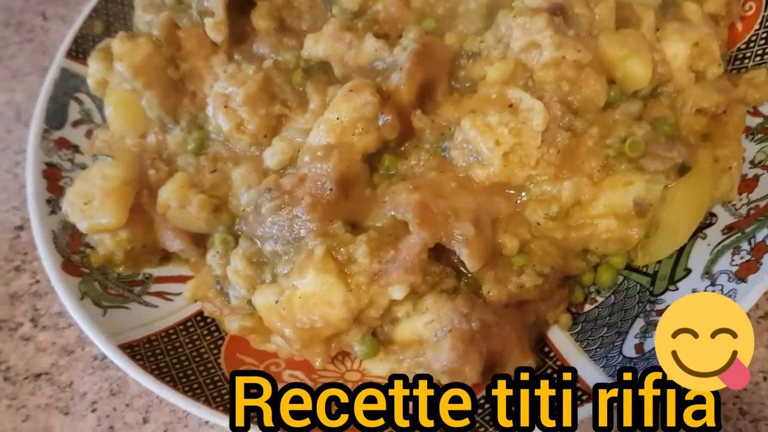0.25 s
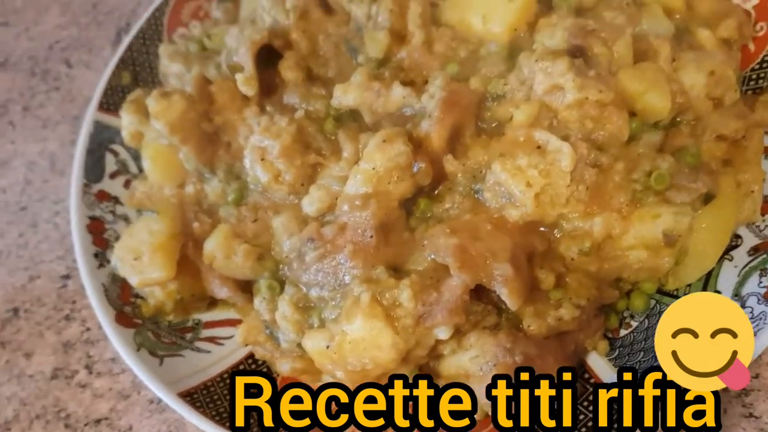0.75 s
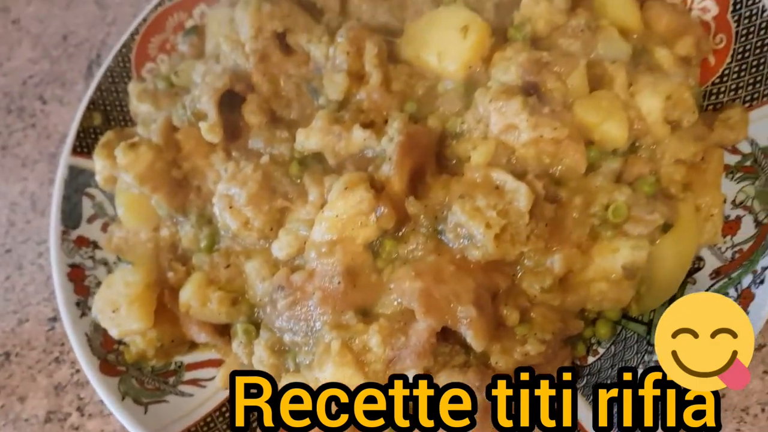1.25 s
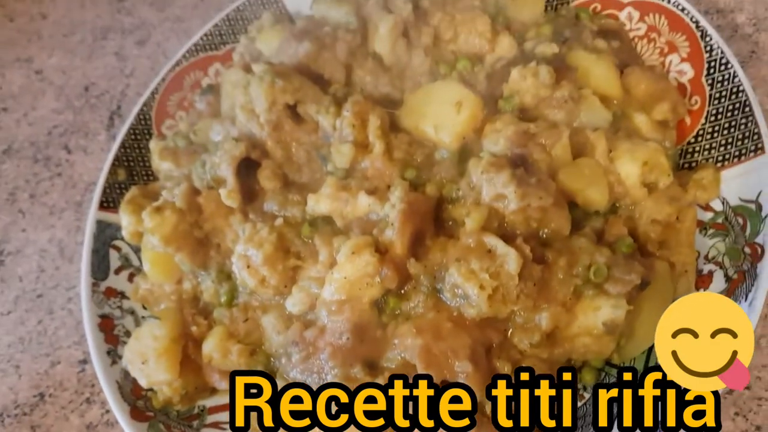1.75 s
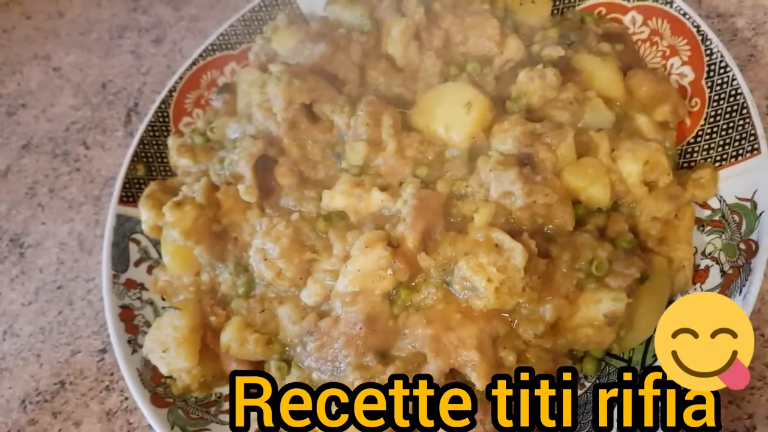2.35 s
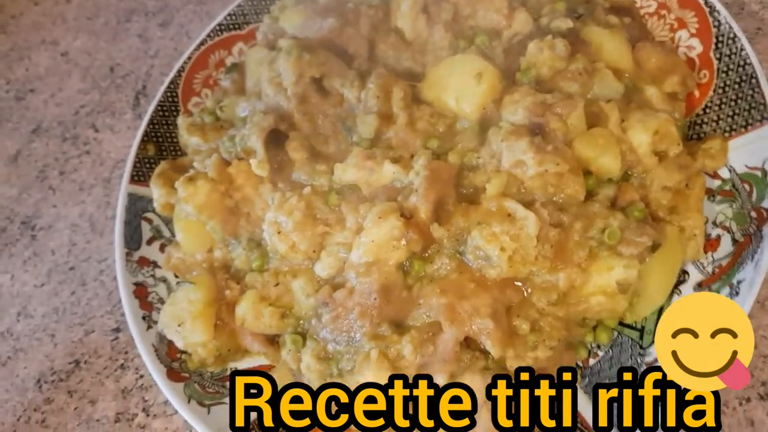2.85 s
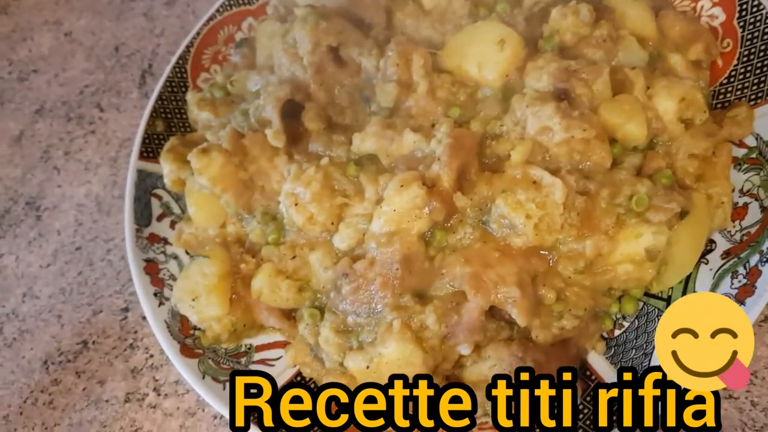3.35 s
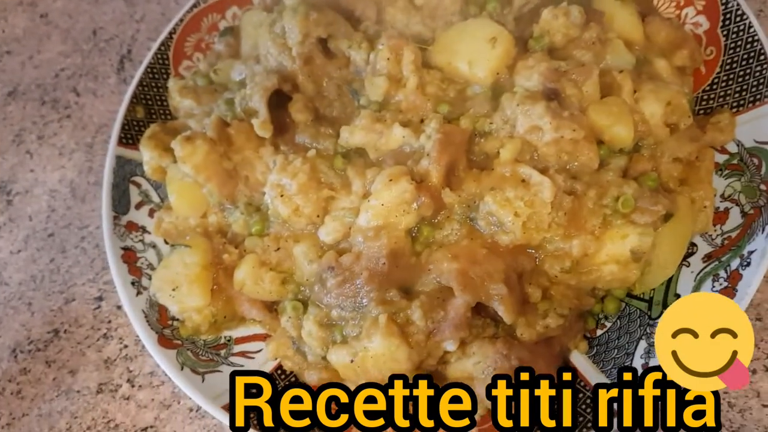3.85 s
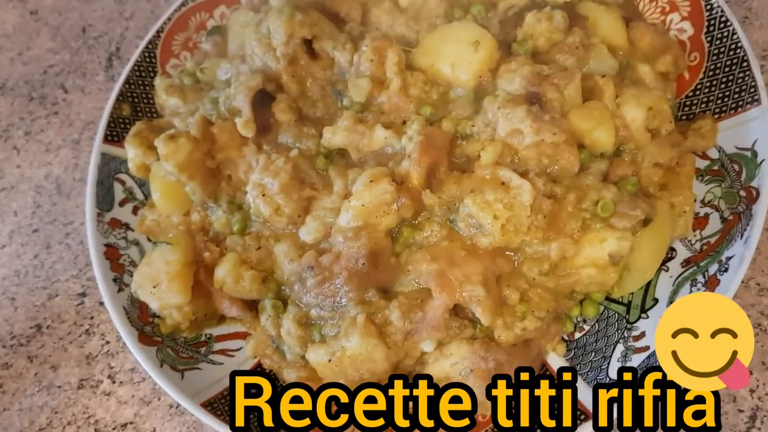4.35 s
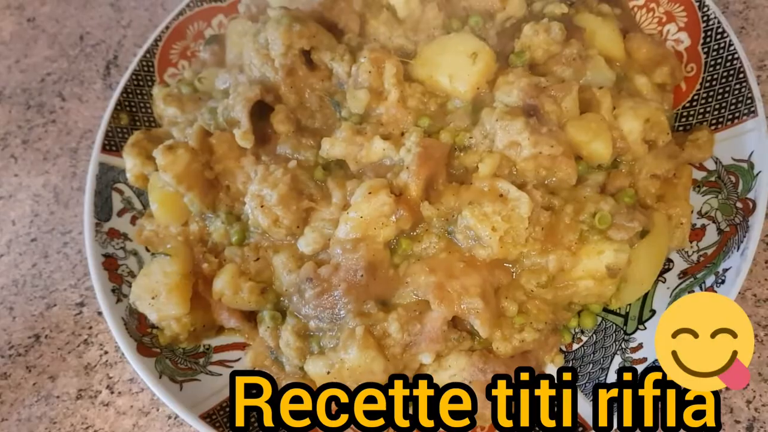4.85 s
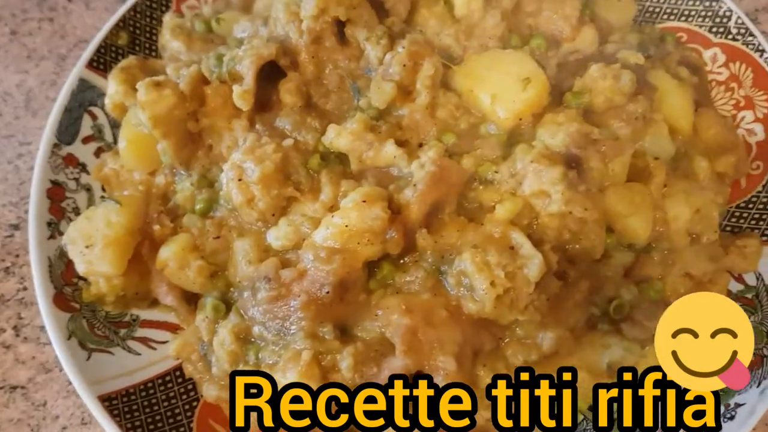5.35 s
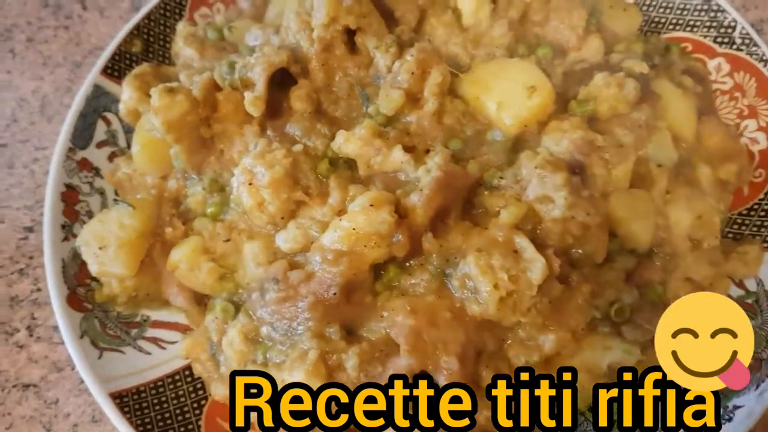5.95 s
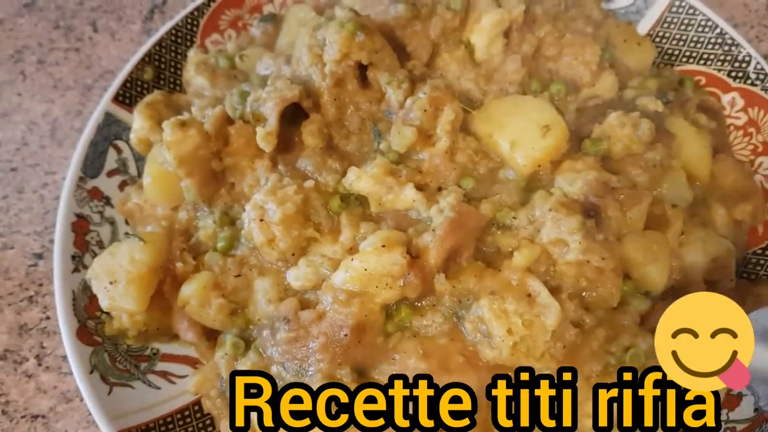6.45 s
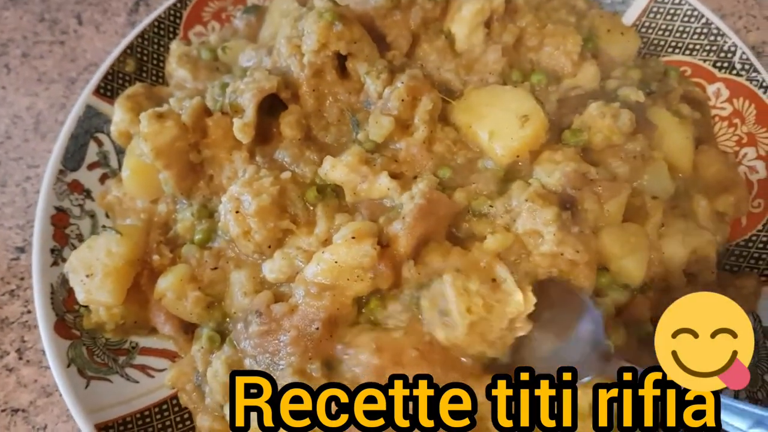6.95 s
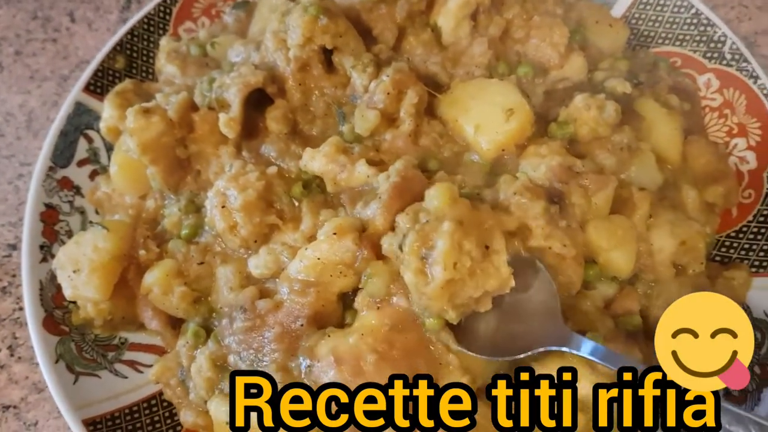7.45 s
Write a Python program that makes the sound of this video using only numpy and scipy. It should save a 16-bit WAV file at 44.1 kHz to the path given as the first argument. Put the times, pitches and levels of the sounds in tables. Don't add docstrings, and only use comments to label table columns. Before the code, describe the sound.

Handheld stereo phone close to a plate of food, with a constant low electrical hum and thin whine from a refrigerator. Low muffled handling rumble and thumps on the right end in one sharp pop, after which everything is quieter for a while. Distant street noise and small chirps pass. A cut shifts the hum, followed by soft sleeve rustling, deep engine throbs, and bright little spoon clinks with short scrapes.

```python
import sys
import numpy as np
from scipy import signal
from scipy.fft import rfft, irfft, next_fast_len
from scipy.io import wavfile
from scipy.ndimage import uniform_filter1d, map_coordinates

SR = 44100
rng = np.random.default_rng(int(sys.argv[2]) if len(sys.argv) > 2 else 0)


def undo_db(level):
    steps = np.asarray(level, float) / 20
    return 10 ** steps


def inscribe(sig):
    pcm = np.round(np.clip(np.atleast_2d(sig).T, -1, 1) * 32767)
    wavfile.write(sys.argv[1], SR, pcm.astype(np.int16))


N = 340011

SHAFT_HZ, MAINS_HZ = 49.122, 49.97
CUT_S, SPLICE_S = 5.668, .005
BEAT_FIRST_S, BEAT_SECOND_S = .2, .2 + 6 / SHAFT_HZ

SHAFT_ORDERS = {2: (-61.5, -62, -61, -60), 3: (-66, -66, -64.5, -62.5), 6: (-61.5, -65, -64.5, -65.5),
                11: (-67.5, -66, -83, -66), 12: (-62.5, -65, -60, -67), 13: (-74, -63, -88.5, -72),
                20: (-106, -66.5, -94, -83), 51: (-71, -72.5, -73.5, -78), 54: (-77, -75.5, -73, -81),
                55: (-63.5, -67, -70, -77), 56: (-69, -56.5, -80.5, -69), 57: (-64.5, -68.5, -68, -70),
                58: (-91, -83.5, -63, -71), 60: (-66, -72.5, -98, -78), 61: (-73.5, -77, -72, -85),
                62: (-72, -66.5, -73, -73), 67: (-77, -77.5, -94, -92), 70: (-74.5, -80, -91, -86),
                74: (-72.5, -73, -77, -72), 76: (-77, -83.5, -80, -86), 77: (-78.5, -79, -90, -72),
                79: (-84, -84, -82, -86), 80: (-72.5, -74.5, -72, -77.5), 87: (-77, -72.5, -88, -86)}
# [multiple, level/dB]
MAINS_ORDERS = [(2, -58), (4, -81.5)]
START_SPOT = {6: 2.7, 11: -5.5, 12: 5.1, 13: -4, 20: -14, 51: -4.5, 55: 1, 56: -3.5, 57: 2.5, 62: -6, 87:
              -12}
LAST_SPOT = {55: 2.5, 56: -6, 57: -2, 60: 4, 79: 6, 87: 2}
FIRST_MOVE_S = [0.77, 1.9]
LAST_MOVE_S = [4.2, 4.9]
NODE_SWELLS = [
    (1.52, 0.42, -2.5, 0.29),
    (2.55, 0.95, 3.5, 0.1),
    (5.47, 0.17, 2, 0.057),
]
NODE_DB = -4.5
WHINE_SWELLS = [(1.6, 0.745, -70, 2.3), (2.4, 3.8, -78, 1.2)]
# [f/Hz, level/dB]
CASING_SPECTRUM = [(700, -22), (1200, -11.5), (2000, -25), (2800, -4.5), (3800, -6), (4300, -5.5),
                   (5000, -9), (5700, -2.5), (7200, -15.5), (8060, -10.5), (8700, -10), (9500, -32.5)]
CASING_LEVELS = [-63.5, -63.5]

# [f/Hz, level/(dB per Hz)]
AIR_SPECTRA = [
    [(18, -35), (30, 11.5), (102, -6.5), (303, -7.5), (491, -8.5), (595, -10.5), (854, -19), (987, -17), (1560, -29), (2290, -32), (2780, -14), (4960, -24), (8220, -31), (9500, -44.5), (12400, -76), (20900, -120)],
    [(18, -56), (30, -7.5), (87, -1), (206, -19), (296, -12), (479, -18.5), (581, -15), (794, -31), (1450, -34.5), (2290, -38), (2780, -24.5), (4960, -33), (8030, -31), (9500, -63), (12400, -81.5), (20900, -120)],
]
AIR_LEVELS = [-55, -54]
# [f/Hz, level/dB]
LEFT_RIGHT_TILT = [(60, -1.5), (110, -6.5), (200, -6), (380, 2), (700, -7), (1290, -8), (2380, 4),
                   (4400, -6), (8120, 7), (15000, -9)]
# [f/Hz, likeness]
LIKENESS = [(60, 0.88), (180, 0.81), (550, 0.44), (1650, 0.065), (4970, 0.072), (15000, 0.014)]
SWAY, SWAY_HZ = 0.27, 500
# [f/Hz, level/(dB per Hz)]
STREET_SWELLS = [(.5, 1.6, -71, .7), (1.75, .35, -68, 0.34)]
STREET_SPECTRUM = [(500, -20.5), (900, -4.5), (1200, 4), (1600, -0.5), (2300, -9.5), (3000, -26)]
ENGINE_SWELLS = [(5.8, 1.95, -59.5, 0.5)]
SURGE_SWELLS = [
    (6.69, 0.078, -45, 0.14),
    (7.02, 0.074, -48, 0.16),
]
SURGE_HZ = 61
# [f/Hz, level/(dB per Hz)]
HISS_SPECTRUM = [(6000, -34), (9300, -9), (11000, -1), (12700, 1), (15000, 0), (16000, -5.5)]

# [f/Hz, level/(dB per Hz)]
RUB_SWELLS = [
    (0, 1.5, -43, 0.93),
    (.62, .01, -42, .8),
    (1.2, .01, -40, 0.45),
    (2.19, .012, -33, .018),
]
RUB_SPECTRUM = [(15, -1.5), (35, -8.5), (55, 7), (120, -4), (250, -27), (500, -25), (900, -48), (3000, -72)]
SCUFF_SWELLS = [(.63, 0.038, -48.5, 0.063), (.83, .004, -55, 0.06)]
# [f/Hz, level/dB]
PORT_COVER = [(.8, 0.7), (1.2, 1), (2.2, 1), (2.23, 0)]
COVER_LOSS = [(300, 3), (1000, -4.5), (2400, -2), (4400, -22), (8000, -37), (12000, -15)]
# [t/s, rise/ms, size]
PRESSURE_STEPS = [(.3174, .9, .045), (.6621, .9, -.18), (.83, 1.5, .015), (2.153, .6, -.04),
                  (2.158, 1, .06), (2.1703, .55, .56), (2.1929, .07, .17), (2.2041, .3, .06)]
# [t/s, depth]
SKIN_SNAPS = [(2.1645, .1), (2.1682, .4), (2.1694, .85), (2.17, 1.4), (2.175, .12)]
SKIN_TEARS = [(2.1935, .6), (2.1946, .4), (2.1961, .18), (2.1987, .28), (2.2019, .32), (2.2038, .5)]
SNAP_MS, TEAR_MS = .085, 0.12
# [f/Hz, level/(dB per Hz)]
PEEL_SWELLS = [
    (2.16, 0.0053, -58, .03),
    (2.182, 0.025, -32.5, .004),
    (2.194, 0.01, -26, .012),
    (2.21, .02, -57, .03),
]
SKIN_SPECTRUM = [(200, 5), (1500, 2), (5000, -8.5), (7000, -8), (8000, -26), (11000, -11.5), (15500, -13)]
# [f/Hz, level/dB]
PORT_STAGES = [(11.5, .3), (61, 2.4)]
PORT_LOSS = [(4500, 0.5), (7800, -18.5), (11000, -1.5)]
OPEN_S, OPEN_T60_S = 2.206, .05

# [t/s, level/dB, f/Hz]
BIRD_CHIRPS = [(1.975, -73, 5060), (2.04, -66, 4520), (2.225, -64, 4540), (2.395, -61, 4590),
               (2.574, -60, 4610)]

# [t/s, peak level/dB, centre f/Hz, width/octaves, left-right level/dB]
SPOON_TICKS = [(5.625, -54, 7000, 1, -1.5), (6.8277, -42, 11700, 0.25, -5), (6.9126, -50.5, 9500, 0.38, -1),
               (6.986, -50.5, 13000, 0.13, -3), (7.0097, -43, 3200, 0.24, 2), (7.01, -44.5, 2800, 1.4, -4),
               (7.106, -48.5, 12000, 0.35, 3), (7.147, -51.5, 11700, 0.17, -2),
               (7.226, -53.5, 1890, 0.37, 0), (7.239, -52.5, 1700, .3, 6), (7.2928, -50, 11000, .4, -2),
               (7.3198, -50.5, 8000, .5, -6), (7.3385, -55, 11000, 0.4, -4.5), (7.3446, -46, 6340, .4, -2)]
# [t/s, peak level/dB, f/Hz, slip gap/s]
SPOON_DRAG = [
    (7.119, -57, 880, .029),
    (7.222, -54.5, 830, .028),
    (7.321, -62, 835, .044),
]
GRIP_DB = 1
# [f/Hz, level/(dB per Hz)]
SCRAPE_SWELLS = [(7.12, .17, -67.5, 0.03), (7.3, 0.13, -67.5, 0.066)]
PLATE_SPECTRUM = [(650, -15), (850, -7), (1100, -21)]

# [f/Hz, level/(dB per Hz)]
SLEEVE_SWELLS = [(6.05, .005, -58, 0.11), (6.19, .005, -64, .15), (6.31, .005, -65, .15),
                 (7.03, .005, -65.5, 0.097), (7.31, .005, -61.5, 0.13), (7.42, .005, -60.5, .1)]
CLOTH_SPECTRUM = [(1500, -24), (3000, -1), (5500, 5.5), (9000, -4.5), (12000, 7), (15700, 3)]
# [f/Hz, level/(dB per Hz)]
BRUSH_SWELLS = [(6.16, 0.15, -60.5, .22)]
COUNTER_SPECTRUM = [(800, -12.5), (1000, -7), (1700, -9.5), (2200, 0), (4500, -2.5), (7000, -12)]

REST_DB, DUCK_DB, CEILING_DB = -1.5, -10, -0.5
DUCK_S, HOLD_S, RELEASE_DB_PER_S = 2.164, 2.15, 10.5
SECOND_DB, SAG_DB_PER_S, JOIN_DB, JOIN_S = -1.5, -0.4, -2.5, .09
BASS_DB, BASS_DIP_DB = 2, -15
TOP_HZ = 15780


def unit(x):
    return x / np.sqrt(np.mean(x ** 2, axis=-1, keepdims=True) + 1e-20)


def along(points, hz):
    f, v = np.transpose(points)
    return np.interp(np.log(hz + 1), np.log(f + 1), v)


def burst(rows):
    t = np.arange(N) / SR
    levels = []
    for s, hold, db, edge in rows:
        outside = np.clip(np.maximum(s - t, t - s - hold), 0, 9)
        levels.append(db - 20 * outside / edge)
    return undo_db(np.max(levels, axis=0).clip(-200))


def wobble(rate, size=N):
    return map_coordinates(rng.standard_normal(204), [np.linspace(0, rate * N / SR, size)])


def filtered(x, response):
    m = next_fast_len(N + SR // 2)
    return irfft(rfft(x, m) * response(np.fft.rfftfreq(m, 1 / SR)), m)[..., :N]


def noise(spectrum, alike):
    def mid_side(hz):
        angle = np.arccos(np.clip(along(alike, hz), -1, 1)) / 2
        return undo_db(along(spectrum, hz)) * [np.cos(angle), np.sin(angle)]
    mid, side = filtered(rng.standard_normal((2, N)), mid_side)
    return unit(np.array([mid + side, mid - side]))


def add_at(out, s, sound):
    start = round(s * SR)
    out[:, start:start + sound.shape[-1]] += sound


def second_shot():
    return np.arange(N) > CUT_S * SR


def beat_clock():
    return np.arange(N) / SR - np.where(second_shot(), BEAT_SECOND_S, BEAT_FIRST_S)


def shaft_tones(t):
    out = np.zeros((2, N))
    knots = np.linspace(0, N, 400)
    after_cut = knots > CUT_S * SR
    early = np.interp(knots / SR, FIRST_MOVE_S, [1, 0])
    late = np.interp(knots / SR, LAST_MOVE_S, [0, 1]) * (knots < CUT_S * SR)
    for k, db in SHAFT_ORDERS.items():
        carrier = np.exp(2j * np.pi * k * SHAFT_HZ * t)
        if k == 6:
            carrier = carrier * undo_db(NODE_DB * burst(NODE_SWELLS))
        start = rng.uniform(0, 2 * np.pi, 3) * (k > 2.5)
        fade = min(k / 50, 1)
        spot_db = START_SPOT.get(k, 0) * early + LAST_SPOT.get(k, 0) * late
        for ch in range(2):
            phase = start[0] + fade * (.3 * start[1 + ch] + .8 * wobble(1.2, size=400))
            level = np.where(after_cut, db[2 + ch], db[ch]) + 3.0 + spot_db
            level = level + 2.8 * fade * wobble(1.4, size=400)
            slow = undo_db(level) * np.exp(1j * phase)
            out[ch] += (np.interp(np.arange(N), knots, slow) * carrier).imag
    return out


def casing(t):
    angle = t * SHAFT_HZ % 1 * 512
    laps = [np.interp(angle, np.arange(512), rng.standard_normal(512), period=512) for _ in range(4)]
    laps = np.array(laps)
    blend = 1.6 * np.array([wobble(1.2), wobble(1.2)])
    mixed = np.cos(blend) * laps[:2] + np.sin(blend) * laps[2:]
    weak = unit(filtered(mixed, lambda hz: undo_db(along(CASING_SPECTRUM, hz))))
    return undo_db(np.where(second_shot(), CASING_LEVELS[1], CASING_LEVELS[0])) * weak


def fridge():
    t = beat_clock()
    mains = sum(-undo_db(db - 3.0) * np.sin(2 * np.pi * k * MAINS_HZ * t) for k, db in MAINS_ORDERS)
    drift = [2 * wobble(5), 2 * wobble(5)]
    whine = burst(WHINE_SWELLS) * np.sin(2 * np.pi * 164 * SHAFT_HZ * t + drift)
    return mains + shaft_tones(t) + whine + casing(t)


def kitchen():
    throb = 1 + .15 * np.sin(2 * np.pi * SHAFT_HZ * np.arange(N) / SR)
    first, second = [undo_db(db + 1.6 * wobble(4.8)) * throb * noise(spectrum, LIKENESS)
                     for spectrum, db in zip(AIR_SPECTRA, AIR_LEVELS)]
    first = filtered(first, lambda hz: undo_db(np.outer([.5, -.5], along(LEFT_RIGHT_TILT, hz))))
    room = np.where(second_shot(), second, first)
    room = filtered(room, lambda hz: 1 / (1 + (40 / (hz + 1)) ** 6))
    beat = np.cos(2 * np.pi * 2 * (MAINS_HZ - SHAFT_HZ) * beat_clock())
    return room - SWAY * beat * filtered(room, lambda hz: 1 / (1 + (hz / SWAY_HZ) ** 4))


def hiss():
    return undo_db(-68.5) * noise(HISS_SPECTRUM, [(1000, 0)])


def rubbing():
    lumps = unit(undo_db(3 * wobble(22)) * noise(RUB_SPECTRUM, [(50, 0)])[0])
    scuff = noise([(200, 5.5), (1500, -11.5), (4000, -19), (6000, -47)], [(50, 0.0095)])[0]
    return burst(RUB_SWELLS) * lumps + burst(SCUFF_SWELLS) * scuff


def pops():
    def pressure(hz):
        w = 2j * np.pi * (hz + 1e-3)
        push = 0
        for s, rise_ms, size in PRESSURE_STEPS:
            push = push + size * np.exp(-w * s + (w * rise_ms / 1000) ** 2 / 2) / w
        for dips, ms in (SKIN_SNAPS, SNAP_MS), (SKIN_TEARS, TEAR_MS):
            pointed = 2 * ms / 1000 / (1 - (w * ms / 1000) ** 2)
            push = push - sum(depth * np.exp(-w * s) for s, depth in dips) * pointed
        for f, q in PORT_STAGES:
            push = push * w * w / (w * w + w * 2 * np.pi * f / q + (2 * np.pi * f) ** 2)
        return SR * push * undo_db(along(PORT_LOSS, hz))
    grains = rng.standard_normal(N) * undo_db(6.6 * rng.standard_normal(N))
    skin = unit(filtered(grains, lambda hz: undo_db(along(SKIN_SPECTRUM, hz))))
    damped = undo_db(-60 * np.clip(np.arange(N) / SR - OPEN_S, 0, 1) / OPEN_T60_S)
    return damped * filtered(np.arange(N) == 0, pressure) + burst(PEEL_SWELLS) * skin


def street():
    return burst(STREET_SWELLS) * noise(STREET_SPECTRUM, LIKENESS)


def bird():
    out, t = np.zeros((2, N + SR)), np.arange(SR // 20) / SR
    envelope = np.sin(np.pi * np.clip(t / .048, 0, 1) ** .7)
    for s, db, hz in BIRD_CHIRPS:
        add_at(out, s, undo_db(db) * envelope * np.sin(2 * np.pi * hz * (t - .4 * t ** 2)))
    tail = rng.standard_normal((2, SR // 5)) * undo_db(-60 * np.arange(SR // 5) / SR / .4)
    tail[:, 0] = 18
    return signal.fftconvolve(out, tail / 12, axes=1)[:, :N] * undo_db([[-2], [-5]])


def join():
    t = np.arange(N) / SR - CUT_S
    return (t > 0) * np.clip(1 - t / JOIN_S, 0, 1)


def gain_db():
    t = np.arange(N) / SR
    release = DUCK_DB + RELEASE_DB_PER_S * (t - DUCK_S - HOLD_S)
    ducked = np.clip(release, DUCK_DB, CEILING_DB)
    first = uniform_filter1d(np.where(t < DUCK_S, REST_DB, ducked), size=300)
    second = SECOND_DB + SAG_DB_PER_S * (t - CUT_S) + JOIN_DB * join()
    return np.where(t < CUT_S, first, second)


def spoon():
    out, t = np.zeros((2, N + SR)), np.arange(2048) / SR
    hz = np.fft.rfftfreq(len(t), 1 / SR)
    for s, db, centre_hz, octaves, pan_db in SPOON_TICKS:
        band = np.exp(-.5 * (np.log2((hz + 1) / centre_hz) / octaves) ** 2)
        crack = unit(irfft(rfft(rng.standard_normal((2, len(t)))) * band)) * undo_db(-60 * t / 0.02)
        add_at(out, s, undo_db(db - 0.5 + pan_db * np.array([[.5], [-.5]])) * crack)
    decay = undo_db(-60 * t / 0.037) * (1 - np.exp(-t / 0.002))
    for s, db, ring_hz, gap in SPOON_DRAG:
        for k in range(3):
            ring = np.sin(2 * np.pi * ring_hz * t)
            ring += .5 * np.sin(2 * np.pi * ring_hz * 1.12 * t + rng.uniform(0, 7.2))
            level = db + GRIP_DB * k + 7.5 + np.array([[.7], [-.7]])
            add_at(out, s + k * gap, undo_db(level) * ring * decay)
    scrape = noise([(300, -80)] + PLATE_SPECTRUM + [(2500, -80)], [(800, 0.33)])
    return out[:, :N] + burst(SCRAPE_SWELLS) * scrape


def engine():
    mode = noise([(45, -27.5), (58, 2.5), (61, 8.0), (65, 6.5), (80, -43)], [(60, 1.0)])
    pull = np.sin(2 * np.pi * SURGE_HZ * np.arange(N) / SR + 0.54 * wobble(6))
    return burst(ENGINE_SWELLS) * mode + burst(SURGE_SWELLS) * pull


def sleeve():
    alike = [(1000, 0.33), (4000, 0.12)]
    rustle = burst(SLEEVE_SWELLS) * noise(CLOTH_SPECTRUM, alike)
    brush = burst(BRUSH_SWELLS) * noise(COUNTER_SPECTRUM, alike)
    return undo_db(1.2 * wobble(30)) * (rustle + brush)


def scene():
    air = fridge() + kitchen() + street() + bird() + spoon() + engine() + sleeve()
    s, share = np.transpose(PORT_COVER)
    cover = np.clip(np.interp(np.arange(N) / SR, s, share), 0, 1)
    muffled = filtered(air[1], lambda hz: undo_db(along(COVER_LOSS, hz)))
    air[1] += cover * (muffled - air[1]) + rubbing()
    air[1] += pops() / undo_db(gain_db())
    return air + hiss()


def band_limit(x):
    return signal.sosfilt(signal.butter(12, 16500, fs=SR, output="sos"), x)


def record(dry):
    from_cut = np.abs(np.arange(N) / SR - CUT_S)
    splice = np.sin(np.pi / 2 * np.clip(from_cut / SPLICE_S, 0, 1))
    wet = dry * undo_db(gain_db()) * splice
    bass = filtered(wet, lambda hz: 1 / (1 + (hz / 450) ** 4))
    wet += (undo_db(BASS_DB + BASS_DIP_DB * join()) - 1) * bass
    mix = filtered(wet, lambda hz: (hz < TOP_HZ) + 0.017)
    return band_limit(mix)


dry = scene()
out = record(dry)
inscribe(out)
```